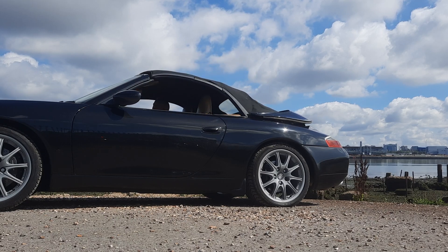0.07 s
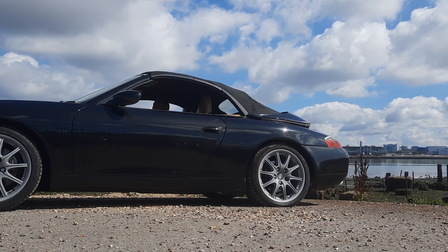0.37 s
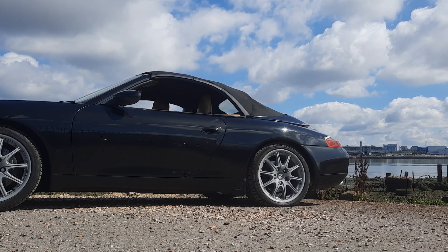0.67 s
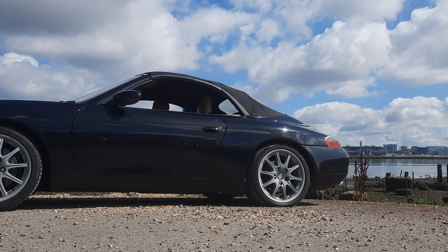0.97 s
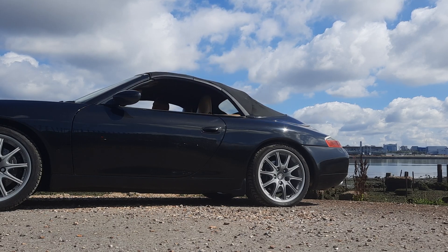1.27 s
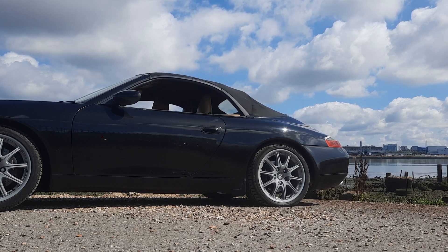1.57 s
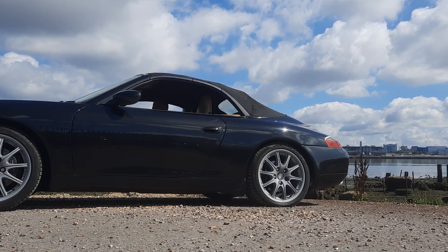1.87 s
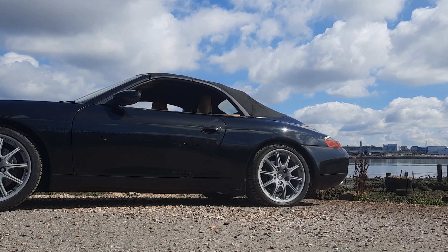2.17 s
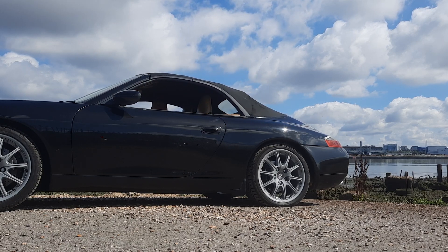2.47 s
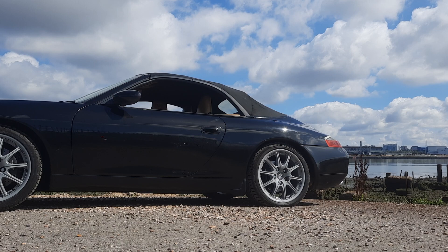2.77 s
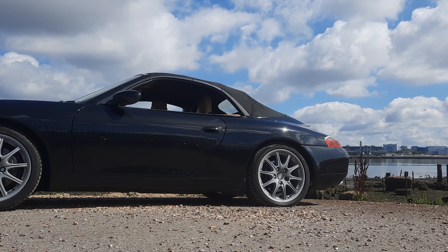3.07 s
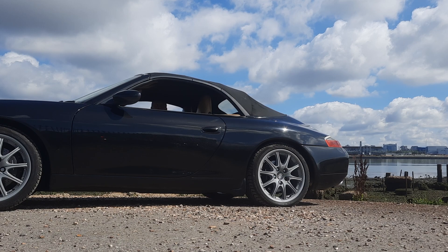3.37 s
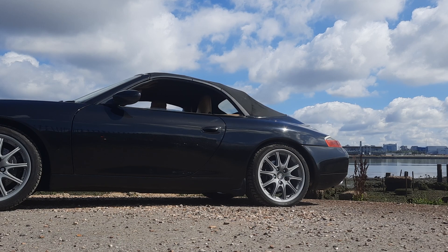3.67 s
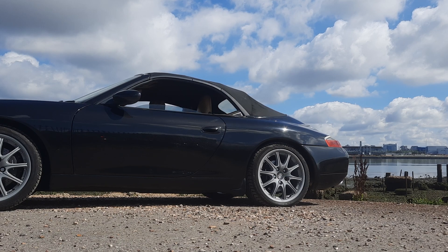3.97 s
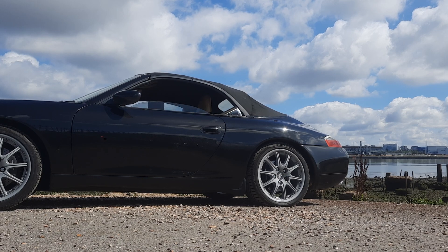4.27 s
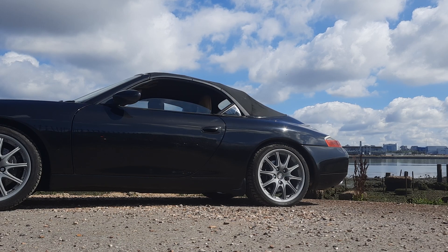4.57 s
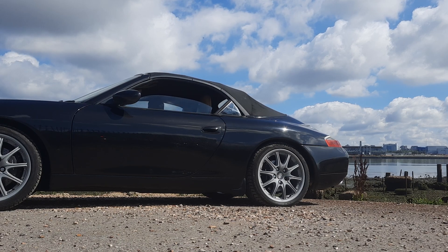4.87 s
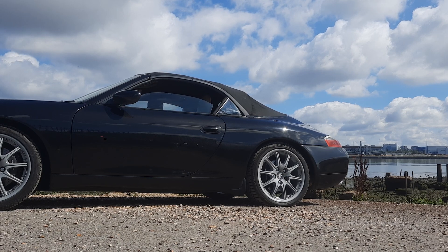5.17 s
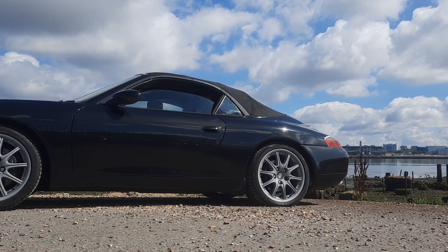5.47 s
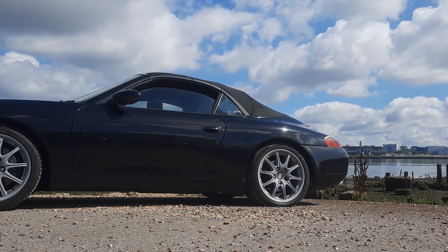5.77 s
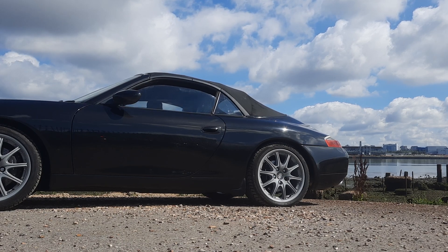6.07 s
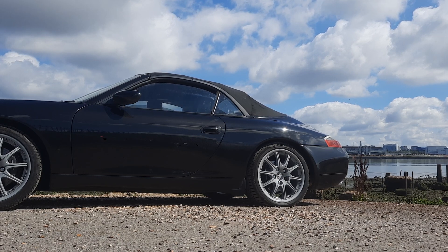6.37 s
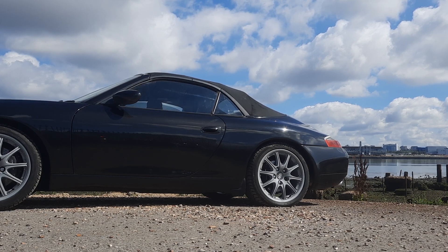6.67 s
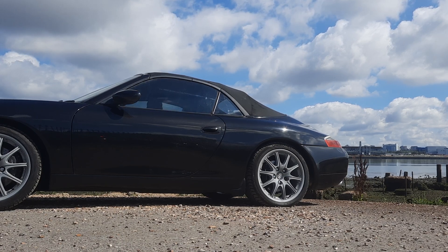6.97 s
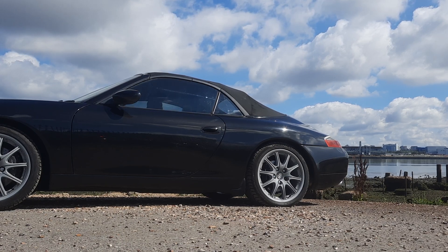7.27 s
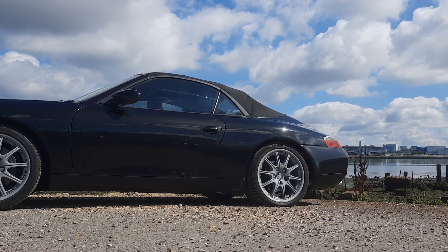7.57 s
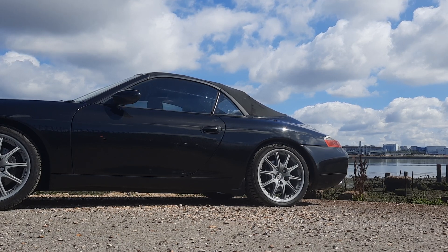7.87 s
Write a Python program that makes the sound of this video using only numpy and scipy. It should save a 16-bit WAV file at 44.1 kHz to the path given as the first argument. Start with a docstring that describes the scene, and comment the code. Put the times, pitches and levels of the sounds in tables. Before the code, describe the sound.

A six-cylinder convertible idles outdoors, close by, with a low exhaust throb, rushing belts and fans and light valve clatter. A soft roof motor hum sinks away, then the roof latch snaps shut. The window glass gives a faint squeak and the drives whirr in swells as the windows rise. The engine keeps idling, with two small hollow surges near the end.

```python
"""A six-cylinder convertible idles, its exhaust throbbing with firing pulses and turbulent gas.
Belts and fans rush in the engine bay, the block rings, the valve gear clatters and a tappet ticks.
The soft top closes and the windows rise: the drives whirr, the roof latch snaps home,
and glass squeaks as it sticks and slips in its seal. A thin electrical whine sits on top."""
import sys
import numpy as np
from scipy import signal
from scipy.fft import rfft, irfft, next_fast_len
from scipy.io import wavfile
from scipy.ndimage import map_coordinates

SR = 44100
rng = np.random.default_rng(int(sys.argv[2]) if len(sys.argv) > 2 else 0)


def wav_out(sig):
    """Save sig, one row per channel (or a flat mono array), as 16-bit PCM at SR to the path in sys.argv[1]."""
    wavfile.write(sys.argv[1], SR, np.round(np.clip(np.atleast_2d(sig).T, -1, 1) * 32767).astype(np.int16))


N = 358091
T = np.arange(N) / SR


# exhaust lines, every third a beat of one cylinder bank: (multiple of the engine cycle, level [dB])
EXHAUST_LINES = [(6, -37.8), (8, -54), (9, -28), (10, -54), (11, -43), (12, -27), (13, -51), (14, -50),
                 (15, -31), (16, -45), (17, -39), (18, -34), (19, -42), (20, -45), (21, -29), (22, -47),
                 (23, -45), (24, -46), (25, -54), (27, -49), (30, -51), (31, -48), (33, -53), (34, -55),
                 (38, -53), (39, -49), (44, -55), (49, -55), (52, -54), (55, -55)]
# colour of the turbulent gas: (frequency [Hz], relative level [dB])
GAS_COLOUR = [(15, -34), (33, -10), (52, -7.5), (78, -3.5), (105, 1), (148, 0.5), (175, -9.5), (240, -16),
              (400, -33)]

def exhaust(cycle, gas_db=-32.5, burn_db=2.5, waver=0.041, rough=0.019, puff_depth=0.11):
    """Firing pulses as a stack of lines that crest together once a cycle, giving the idle its lope."""
    phase = 2 * np.pi * (cycle - .068)
    gas_level = from_db(gas_db + burn_db * drift(2.5))  # uneven burning moves the turbulence
    effort = 1 + waver * drift(15)
    throb = 0
    for k, level_db in EXHAUST_LINES:
        # at lines 9, 15, 21.. the two tailpipes work against each other: a dipole, a quarter wave ahead
        lead = np.pi / 2 * (k % 6 == 3)
        # the lines between the bank beats come from one odd cylinder, which fires a little early
        lead += .5 * (k % 3 > 0)
        # beyond the silencer's lowest and highest resonance the flow turns over
        polarity = 1 if 8 < k < 22 else -1
        uneven = 1 + rough * drift(8.7)  # no two cycles burn alike
        throb += polarity * from_db(level_db) * uneven * np.cos(k * phase + lead)
    puffs = 1 + puff_depth * np.cos(2 * np.pi * 6 * (cycle - 0.02))  # one per cylinder
    gas = gas_level * puffs * air_noise(GAS_COLOUR)
    return np.sqrt(2) * effort * throb * pan(left_db=1.5) + gas


# hums of the belt-driven auxiliaries: (frequency [Hz], level [dB])
PULLEY_HUMS = [(75.6, -39), (100.1, -36.5)]

def pulleys():
    """Low hums that wander a little and beat slowly against the exhaust."""
    hums = sum(from_db(db) * np.sin(2 * np.pi * hz * T + drift(1.62)) for hz, db in PULLEY_HUMS)
    return np.sqrt(2) * hums


# colour of the belt and fan rush: (frequency [Hz], relative level [dB])
RUSH_COLOUR = [(120, -10.5), (245, -5), (330, 0), (460, -9), (580, -8.5), (820, -18.5), (1200, -15.5),
               (1500, -18.5), (2200, -24.5), (3900, -29.5), (4800, -39.5), (7000, -44.5), (9300, -50.5),
               (15000, -87)]
# ringing parts of the engine: (frequency [Hz], bandwidth [Hz], level [dB])
BLOCK_MODES = [(266, 8, -51), (412, 8, -56), (785, 14, -64), (862, 20, -61), (983, 22, -54),
               (1110, 40, -61), (1228, 35, -59), (1288, 22, -61), (1970, 60, -66), (2570, 60, -68),
               (2714, 16, -71)]
# colour of the fine hiss: (frequency [Hz], relative level [dB])
HISS_COLOUR = [(6000, 4), (9300, -4), (10500, 1.5), (12300, 3.5), (15500, 3)]

def engine_bay(cycle, rush_db=-40.0, flutter_db=0.7, hiss_db=-66, spurt_db=2.6):
    """Belts and fans rush, the block rings, and a hiss spurts with each firing of the near bank."""
    rush = from_db(rush_db + flutter_db * drift(25)) * air_noise(RUSH_COLOUR)
    rings = sum(from_db(db) * unit_rms(resonance(rng.standard_normal(N), hz, width))
                for hz, width, db in BLOCK_MODES)
    since_firing = 3 * (cycle - .14) % 1
    hiss = from_db(hiss_db + spurt_db * (0.5 - 2 * since_firing)) * air_noise(HISS_COLOUR)
    return rush + rings * pan(left_db=6.5) + hiss


# engine loads, the window motors and then two idle surges: (start [s], hold [s], level [dB])
ENGINE_LOADS = [(4.45, 2.4, -47.5), (7.285, .08, -38.5), (7.95, .2, -40.5)]

def bay_boom(hz=330, width_hz=30, rest_db=-53.0, ramp_s=0.16):
    """A hollow resonance of the engine bay that swells under each load."""
    loads = sum(from_db(db) * swell(start, ramp_s, hold, ramp_s) for start, hold, db in ENGINE_LOADS)
    hollow = resonance(rng.standard_normal(N), hz, width_hz)
    hollow = resonance(hollow, hz, 3 * width_hz)
    return np.hypot(from_db(rest_db), loads) * unit_rms(hollow) * pan(left_db=3.0)


# valve gear contacts: (position [share of the cycle], level [dB], pitch [Hz])
VALVE_CONTACTS = [(.06, -35, 650), (.27, -35.5, 1130), (.49, -33, 1140), (0.503, -43, 1820),
                  (.54, -36.5, 1140), (.68, -32.5, 607), (.73, -38, 1080)]

def valve_gear(cycle, width_hz=260, scatter_db=2.0):
    """The same few contacts clatter round every cycle, never quite equally hard."""
    clatter = np.zeros(N)
    for position, level_db, hz in VALVE_CONTACTS:
        count = np.floor(cycle - position)
        clicks = np.diff(count, prepend=count[0])
        force = from_db(level_db + scatter_db * rng.standard_normal(N))
        clatter += resonance(clicks * force, hz, width_hz)
    return clatter * pan(left_db=2.0)


# colour of the tick, also of the window's rasp: (frequency [Hz], relative level [dB])
TICK_COLOUR = [(1500, -23), (3500, 17.5), (6500, 13), (9000, 5), (12500, 6), (16000, -12)]
# the tappet's accents: (time [s], level [dB])
TICK_ACCENTS = [(.7332, -55), (1.1712, -52.5), (2.6269, -53), (3.2131, -54), (5.1138, -55), (7.3113, -53),
                (7.6036, -54)]

def tappet(cycle, tick_db=-56.0, scatter_db=1.5, t60=.07):
    """One bright tick a cycle, now and then a harder one, dying away in the engine bay."""
    count, position = np.divmod(cycle + .012, 1)
    age_s = position / (np.gradient(cycle) * SR)
    hardness = np.minimum(rng.exponential(1, N), 2.5) - 1
    ticks = from_db(tick_db + scatter_db * hardness[count.astype(int)] - 60 * age_s / t60)
    accents = sum(blow(time, db, t60) for time, db in TICK_ACCENTS)
    return np.maximum(ticks, accents) * air_noise(TICK_COLOUR)


# strains of the roof and window drives: (peak time [s], length [s], level [dB])
DRIVE_STRAINS = [(1.87, 0.94, -44), (3.0, 0.43, -44), (3.49, .25, -44), (4.72, 0.49, -45),
                 (5.11, 0.7, -39.5), (6.227, .25, -40.5), (6.7, 1, -45.5)]
# colour of their whirr: (frequency [Hz], relative level [dB])
WHIRR_COLOUR = [(200, -29), (370, 0), (460, -3), (600, -4), (800, -15), (1300, -32)]

def drives(steady_db=-53, rise_share=0.42):
    """Motors and linkages whirr steadily behind the panels, swelling whenever they strain."""
    power = from_db(steady_db) ** 2
    for peak, length, db in DRIVE_STRAINS:
        strain = from_db(db) * swell(peak, rise_share * length, 0, (1 - rise_share) * length)
        power += strain ** 2
    return np.sqrt(power) * air_noise(WHIRR_COLOUR)


def roof_motor(hz=299.7, level_db=-46, stop_s=1.6, sink_hz_per_s=57, fade_db_per_s=80, waver=0.0089):
    """A wavering hum that sinks and fades as the motor runs out, once the rear lid is down."""
    off_s = np.maximum(T - stop_s, 0)
    pitch = (hz - sink_hz_per_s * off_s) * (1 + waver * drift(8.1))
    hum = np.sqrt(2) * np.sin(2 * np.pi * np.cumsum(pitch) / SR)
    return from_db(level_db - fade_db_per_s * off_s) * hum


# blows of the roof latch: (time [s], snap level [dB], snap t60 [s], knock level [dB])
LATCH_BLOWS = [(2.4448, -40.5, 0.033, -34), (2.459, -35.5, 0.037, -29), (2.468, -46, 0.052, -40),
               (2.482, -48, 0.054, -52)]
# colour of the snap: (frequency [Hz], relative level [dB])
SNAP_COLOUR = [(400, -8), (750, 9), (1100, 5), (3000, -3), (4300, -1), (7000, -6.5), (9000, -16),
               (11000, -16), (16000, -22)]
# body of the hollow roof frame: (frequency [Hz], bandwidth [Hz], gain [dB])
FRAME_MODES = [(383, 63, 4.5), (644, 50, -4), (720, 40, -11)]

def roof_latch():
    """The catch touches, snaps home and rattles briefly; each blow knocks the hollow frame."""
    snaps, knocks = np.zeros((2, N))
    for time, snap_db, t60, knock_db in LATCH_BLOWS:
        snaps += blow(time, snap_db, t60)
        knocks[round(time * SR)] = from_db(knock_db)
    frame = sum(from_db(db) * resonance(knocks, hz, width) for hz, width, db in FRAME_MODES)
    return snaps * air_noise(SNAP_COLOUR) + frame * pan(left_db=3.0)


# slips of the glass in its seal: (centre time [s], length [s], lowest pitch [Hz], level [dB])
GLASS_SLIPS = [(4.156, .04, 3900, -62), (4.173, .016, 3950, -59), (4.183, .012, 4080, -59),
               (4.195, .03, 3750, -56), (4.208, .012, 3950, -57), (4.224, .024, 4000, -62)]
# timbre of the squeak: (harmonic number, gain [dB])
SQUEAK_HARMONICS = [(1, 1.5), (2, -5), (3, -3)]

def window_squeak(bend=.25, jitter=0.011, grip_db=3.5, rasp_db=-5.0):
    """Glass sticks and slips on rubber: each slip is loudest and lowest in its middle, with a dry rasp."""
    tone, rub = 0, 0
    for centre, length, hz, level_db in GLASS_SLIPS:
        travel = np.clip(2 * (T - centre) / length, -1, 1)
        pitch = hz * (1 + bend * travel ** 2) * (1 + jitter * drift(900))
        phase = 2 * np.pi * np.cumsum(pitch) / SR
        envelope = from_db(level_db) * (1 - travel ** 2)
        tone += envelope * sum(from_db(db) * np.sin(k * phase) for k, db in SQUEAK_HARMONICS)
        rub += envelope
    grip = from_db(grip_db * drift(120))
    rasp = from_db(rasp_db) * rub * air_noise(TICK_COLOUR)
    return tone * grip * pan(left_db=3.0) + rasp


# throb of the whine, faster later on: (time [s], rate [Hz])
WHINE_THROB = [(0, 1.64), (0.7, 0.86), (1.6, 2.5), (3.1, 1.1), (4.0, 1.02), (5.0, 3.77), (6.45, 5.56),
               (6.95, 2.82), (8.12, 4.84)]

def electrical_whine(hz=15034, level_db=-62.5, depth=0.36):
    """A thin, throbbing tone, mostly on the right."""
    throb = 1 + depth * np.cos(2 * np.pi * np.cumsum(over_time(WHINE_THROB)) / SR)
    return from_db(level_db) * throb * np.sin(2 * np.pi * hz * T) * pan(left_db=-11.5)


# stereo width of the airborne noise: (frequency [Hz], side minus mid [dB])
AIR_WIDTH = [(50, -26), (140, -12), (300, -9), (650, -2), (1100, -7), (2000, -5.5), (3300, -4), (5500, 2.5),
             (8000, 1.5), (12000, 0.5)]
# its lean to the left: (frequency [Hz], left minus right [dB])
AIR_BALANCE = [(60, 3.2), (250, 3), (600, 3.1), (1500, 2.6), (3500, 0.37), (4800, 4.6), (6500, 0.39),
               (8000, 1), (10000, 7.5), (14000, 2.8)]

def air_noise(colour):
    """Stereo noise of a given colour, narrow in the bass and wide in the treble; its centre has rms 1."""
    size = next_fast_len(N)
    mid, side = rfft(rng.standard_normal((2, size)))
    ears = mid + side * from_db(over_bins(AIR_WIDTH)) * [[1], [-1]]
    rolled_off = [(colour[0][0] / 2, -90), *colour, (colour[-1][0] * 2, -90)]
    spectrum = ears * from_db(over_bins(rolled_off)) * pan(over_bins(AIR_BALANCE))
    noise = irfft(spectrum, size)[:, :N]
    return noise / np.std(noise.mean(axis=0))


def resonance(x, hz, width_hz):
    """A two-pole resonance; a unit click rings with height 1."""
    r, w = np.exp(-np.pi * width_hz / SR), 2 * np.pi * hz / SR
    return signal.lfilter([np.sin(w)], [1, -2 * r * np.cos(w), r * r], x + 1e-18)


def blow(time, level_db, t60):
    """The envelope of one blow: a sudden start, then a decay of 60 dB in t60 seconds."""
    envelope, start = np.zeros(N), round(time * SR)
    age = T[:min(N - start, SR // 4)]
    envelope[start:start + len(age)] = from_db(level_db - 60 * age / t60)
    return envelope


def swell(full_at, attack, hold, release):
    """An envelope that reaches 1 at `full_at`, holds and falls; all in seconds."""
    rise = 1 + (T - full_at) / attack
    fall = 1 - (T - full_at - hold) / release
    return np.clip(np.minimum(rise, fall), 0, 1)


def drift(rate):
    """A smooth random wander of rms 1, through `rate` random points a second."""
    knots = rng.standard_normal(1024)
    coarse = map_coordinates(knots, [T[::64] * rate], mode="wrap")
    return unit_rms(np.interp(T, T[::64], coarse))


def over_time(points):
    """A (time, value) curve, sample by sample."""
    return np.interp(T, *np.transpose(points))


def over_bins(points):
    """A (frequency, value) curve read on a log axis at every frequency bin."""
    hz, value = np.transpose(points)
    bins_hz = np.fft.rfftfreq(next_fast_len(N), 1 / SR)
    return np.interp(np.log(bins_hz + 1), np.log(hz), value)


def pan(left_db):
    """Left and right gains, `left_db` apart."""
    return from_db(np.array([[.5], [-.5]]) * left_db)


def from_db(db):
    """Decibels to gain."""
    return 10 ** (np.asarray(db) / 20)


def unit_rms(x):
    """Scale to an rms of 1."""
    return x / np.sqrt(np.mean(x ** 2) + 1e-20)


# idle speed, hunting a little once the windows have shut: (time [s], speed [rpm])
IDLE_SPEED = [(0, 804.5), (0.8, 821.8), (2.1, 825.1), (4.3, 818.2), (5.05, 822.2), (5.7, 820.4),
              (6.6, 812.7), (7.1, 827.0), (7.6, 814.5), (8.12, 844.4)]

def scene():
    """The idling engine, with roof and windows at work."""
    cycle = .022 + np.cumsum(over_time(IDLE_SPEED) / 120) / SR  # engine cycles, two turns each
    engine = exhaust(cycle) + pulleys() + engine_bay(cycle) + bay_boom()
    clatter = valve_gear(cycle) + tappet(cycle)
    return engine + clatter + drives() + roof_motor() + roof_latch() + window_squeak() + electrical_whine()


def record(dry, cutoff_hz=15750, fade_s=.004):
    """A short fade at both ends and a steep high cut."""
    fade = np.minimum(1, np.minimum(T, T[-1] - T) / fade_s)
    high_cut = signal.ellip(12, .1, 90, cutoff_hz, fs=SR, output="sos")
    return signal.sosfilt(high_cut, dry * fade)


dry = scene()
out = record(dry)
wav_out(out)
```